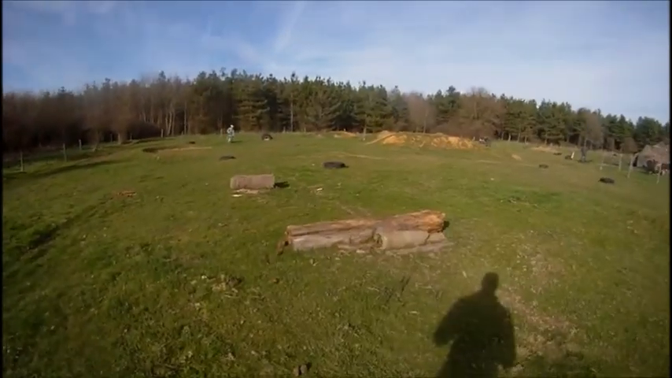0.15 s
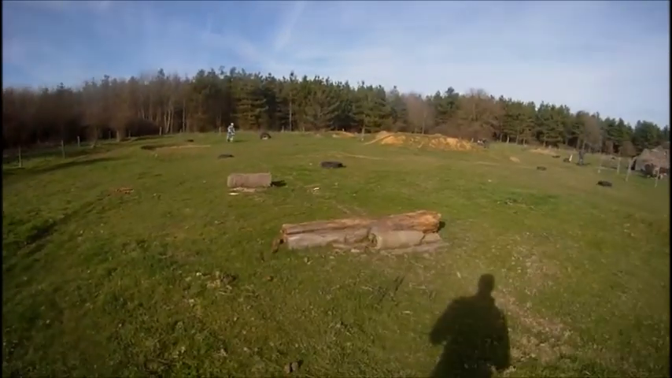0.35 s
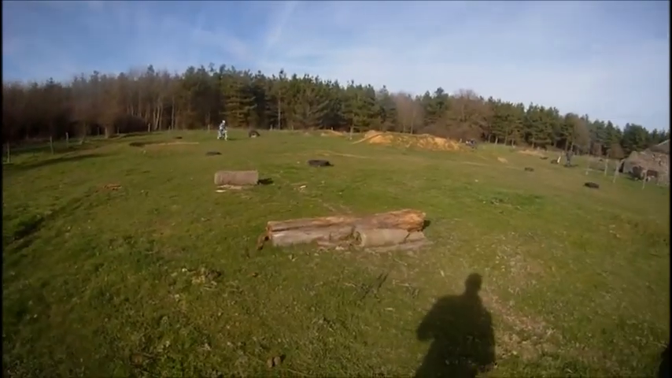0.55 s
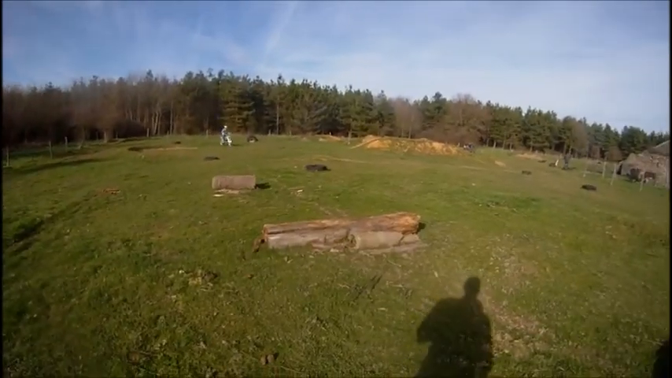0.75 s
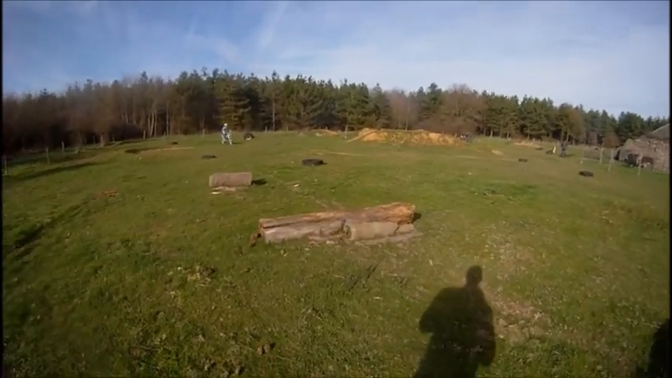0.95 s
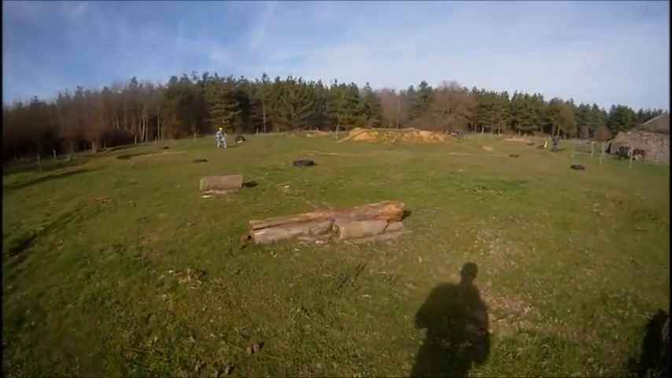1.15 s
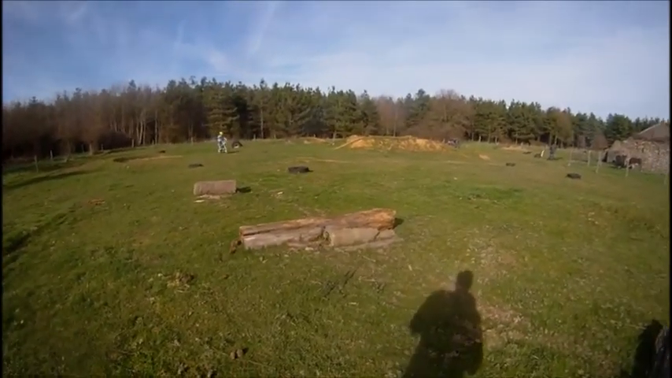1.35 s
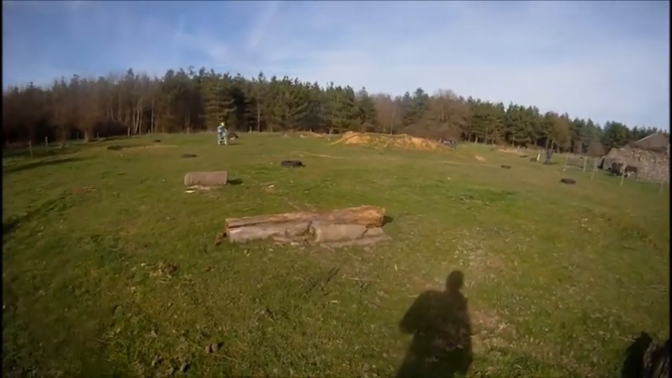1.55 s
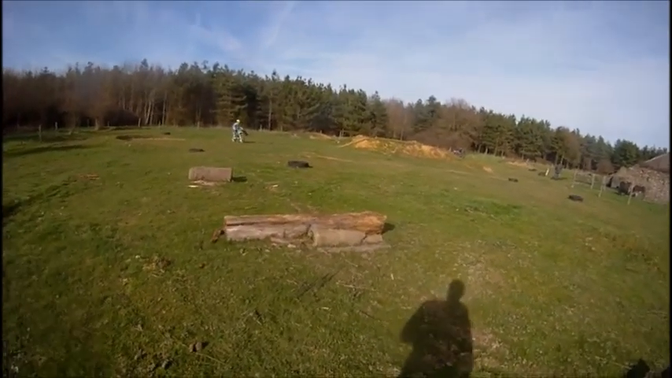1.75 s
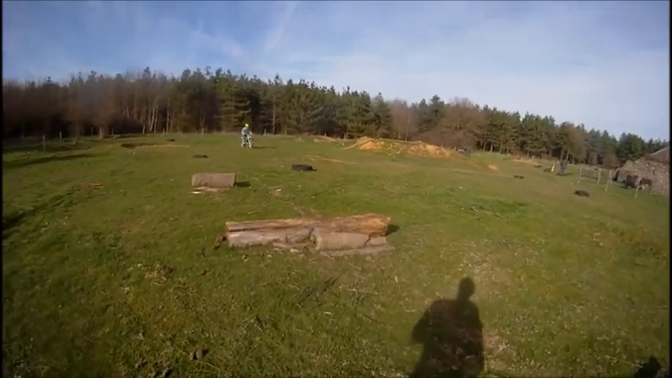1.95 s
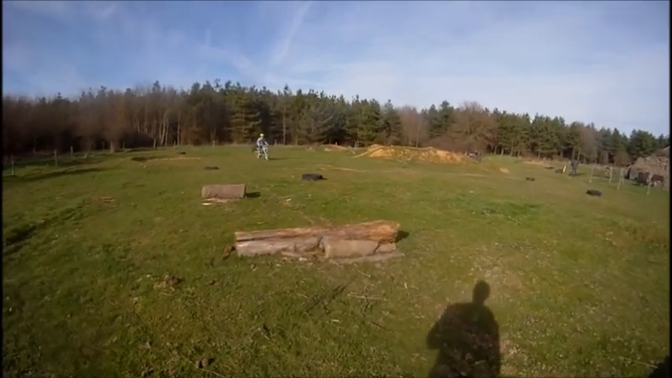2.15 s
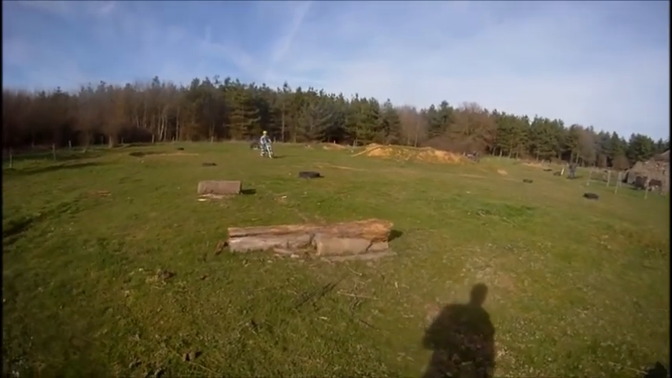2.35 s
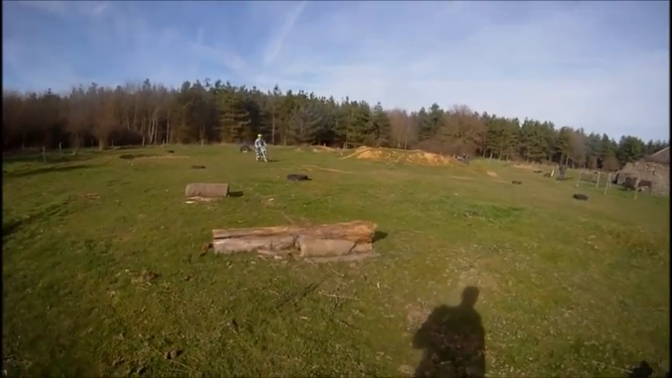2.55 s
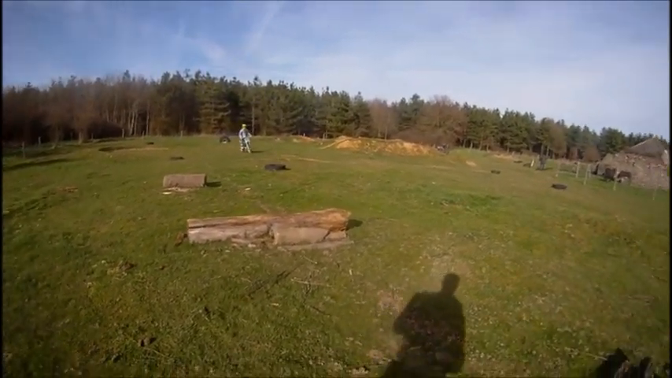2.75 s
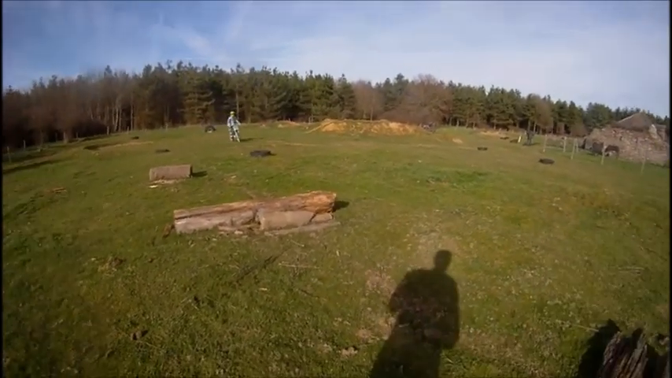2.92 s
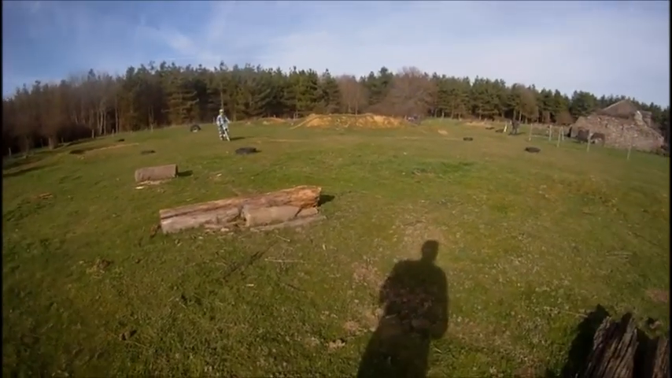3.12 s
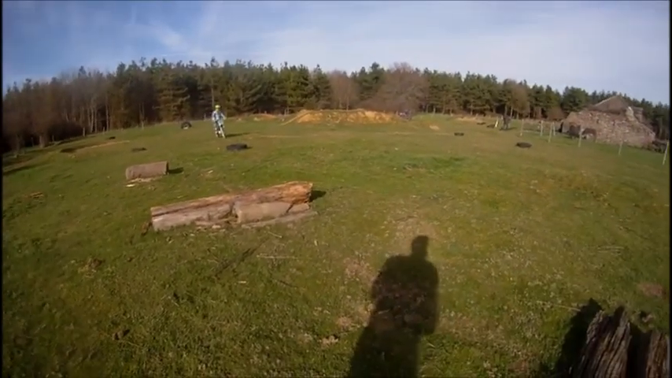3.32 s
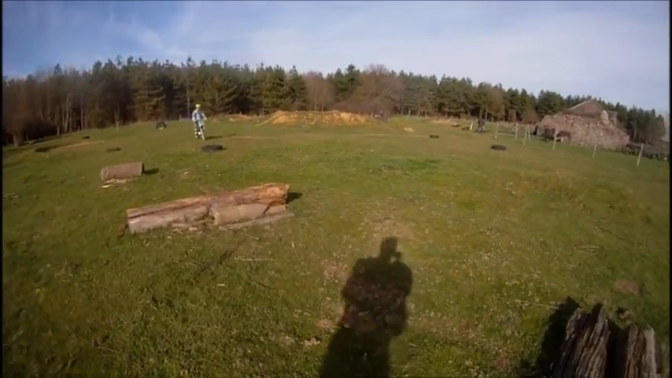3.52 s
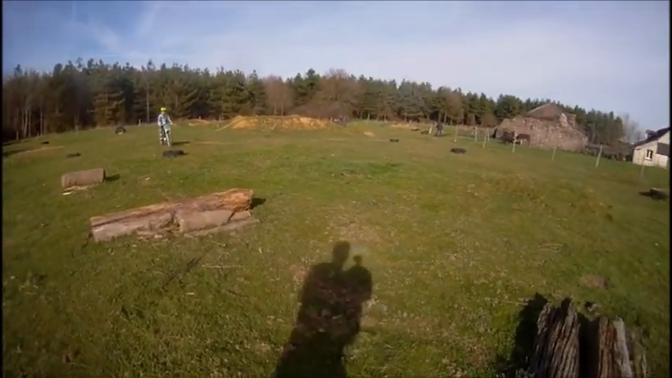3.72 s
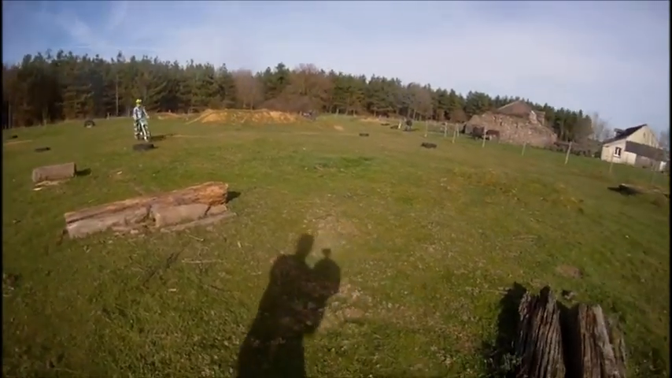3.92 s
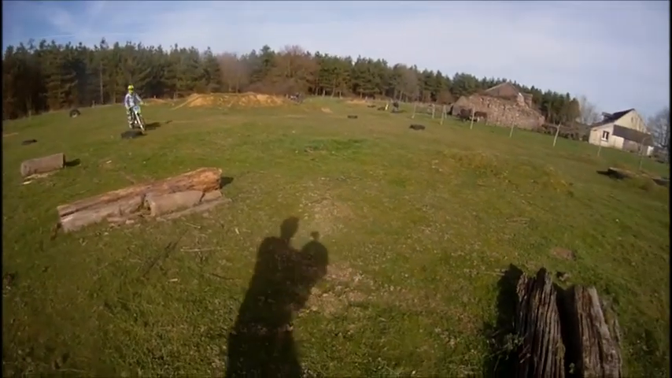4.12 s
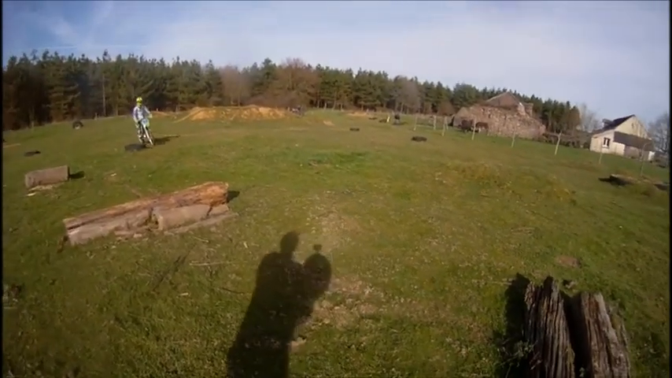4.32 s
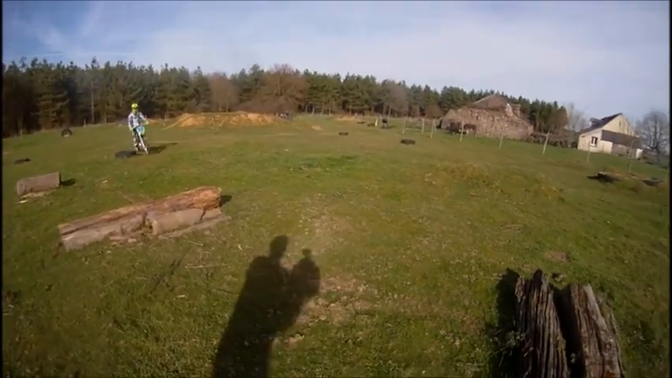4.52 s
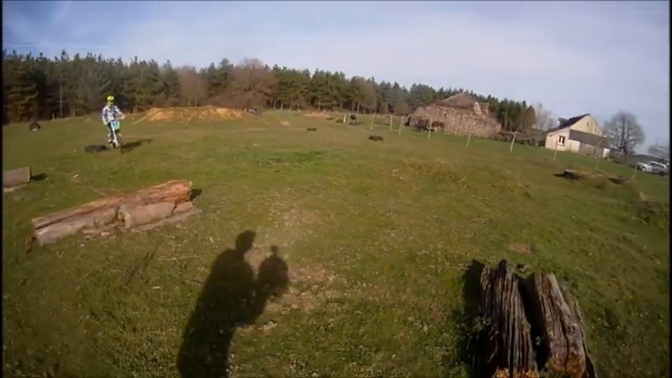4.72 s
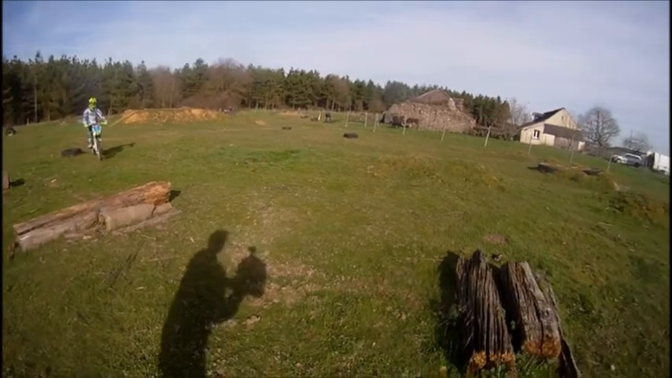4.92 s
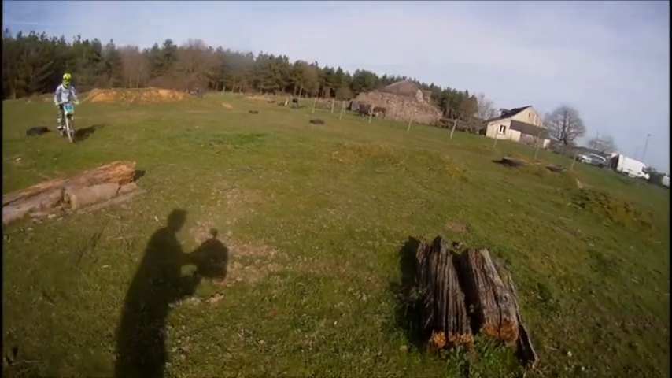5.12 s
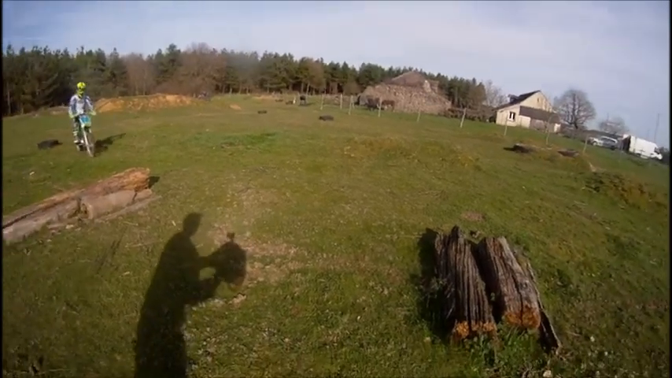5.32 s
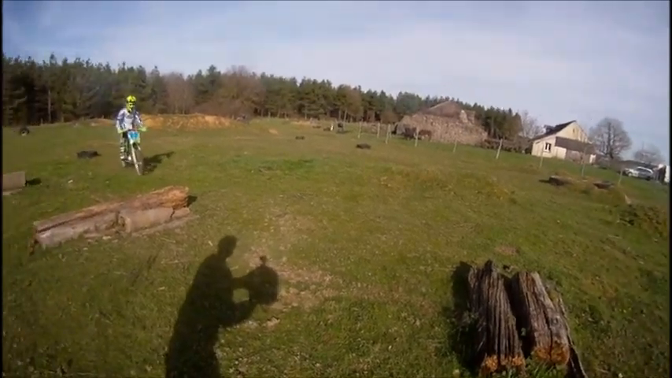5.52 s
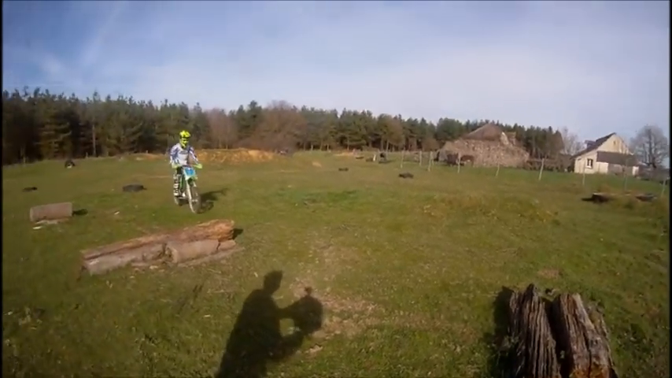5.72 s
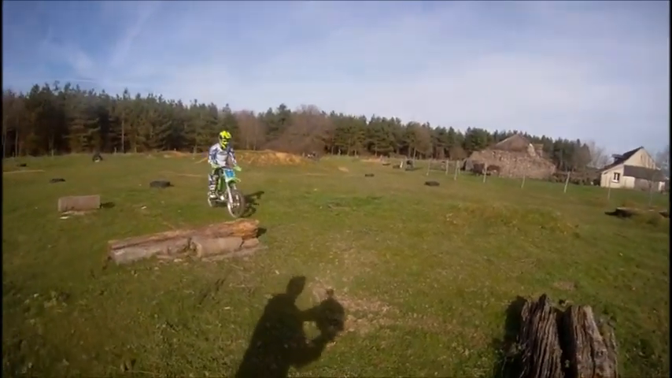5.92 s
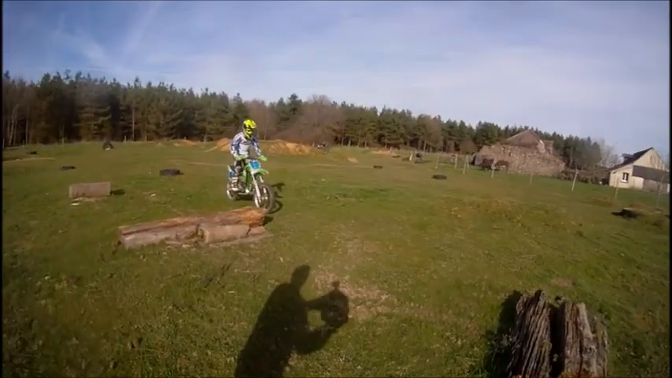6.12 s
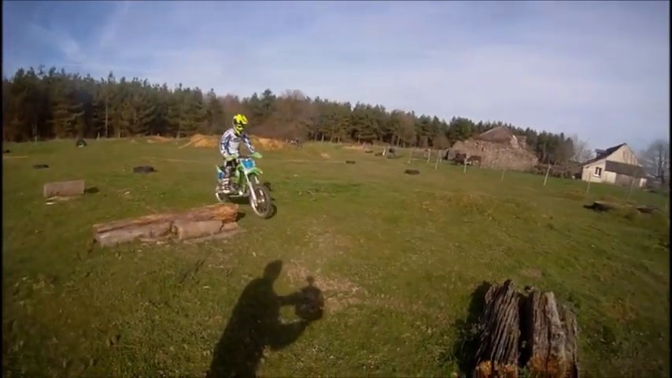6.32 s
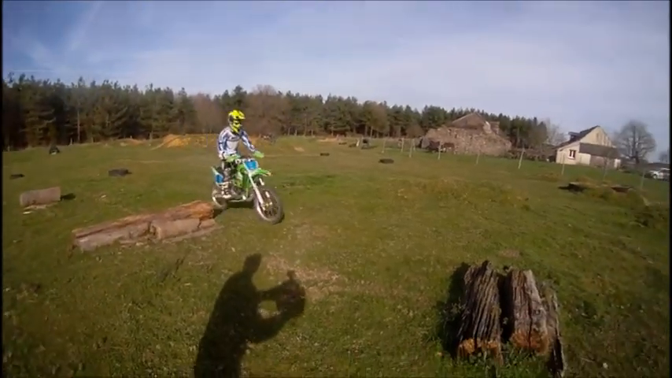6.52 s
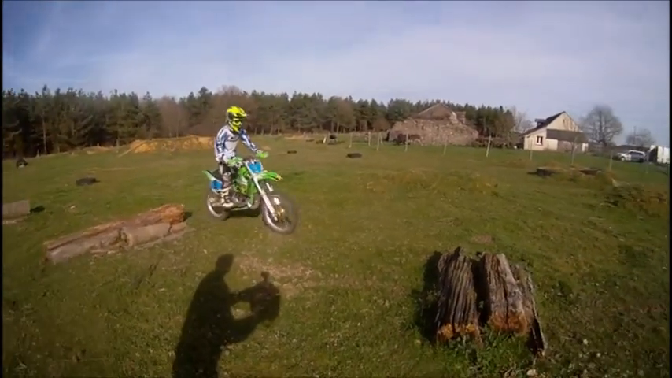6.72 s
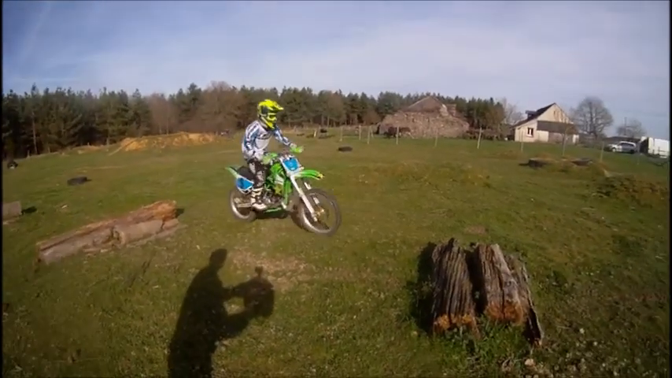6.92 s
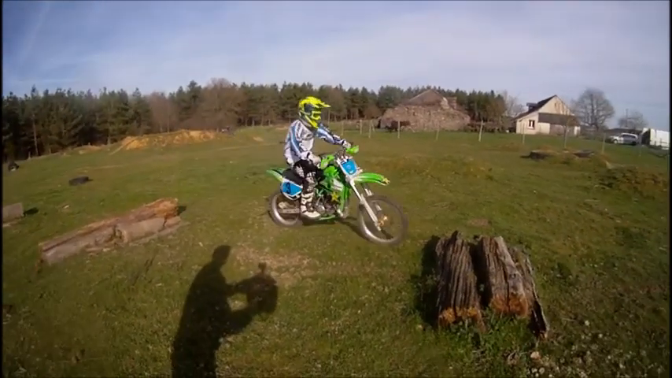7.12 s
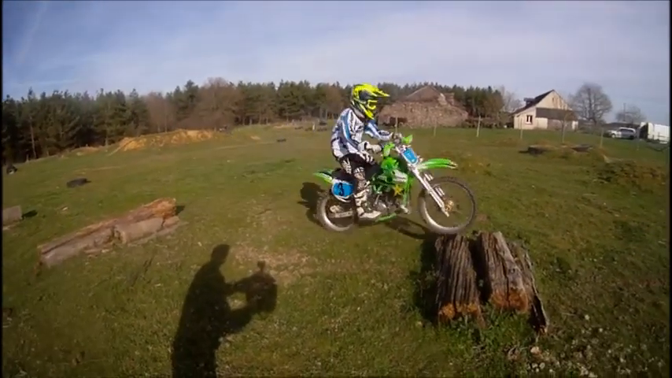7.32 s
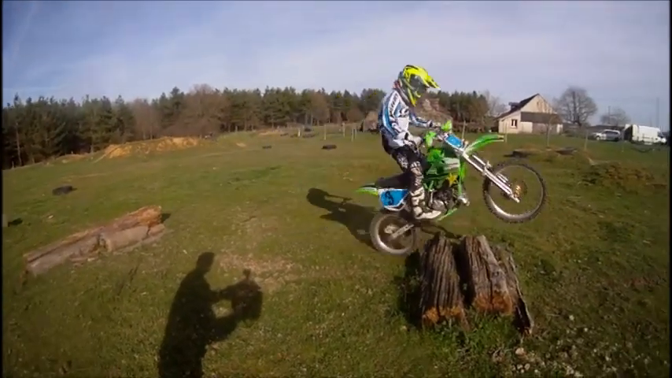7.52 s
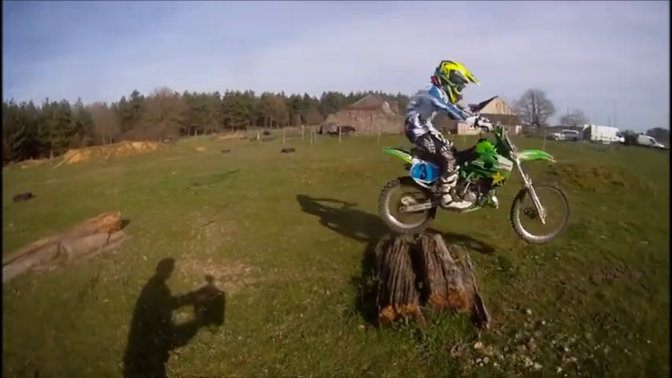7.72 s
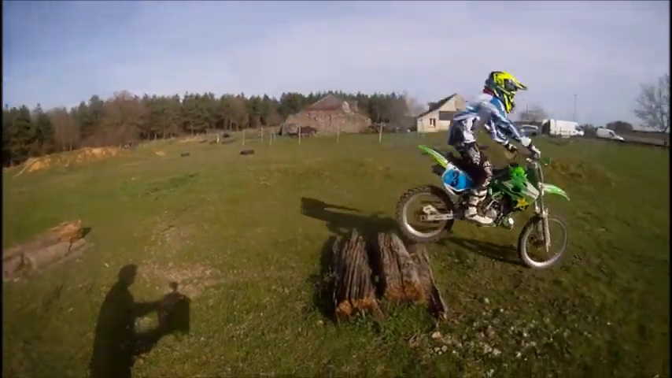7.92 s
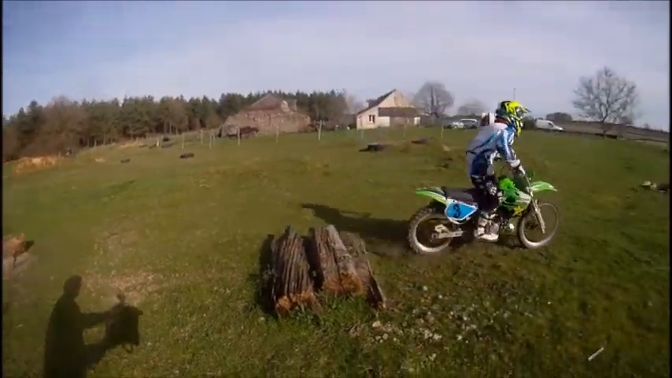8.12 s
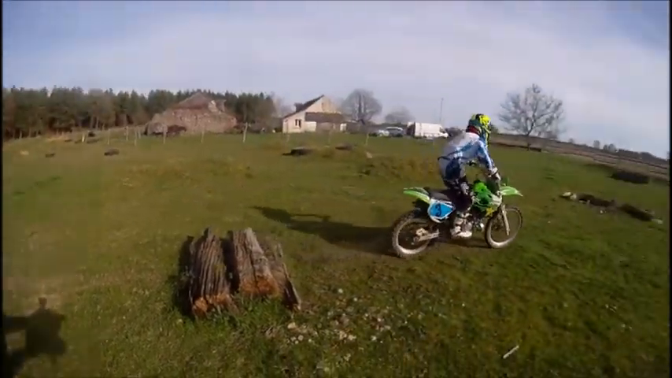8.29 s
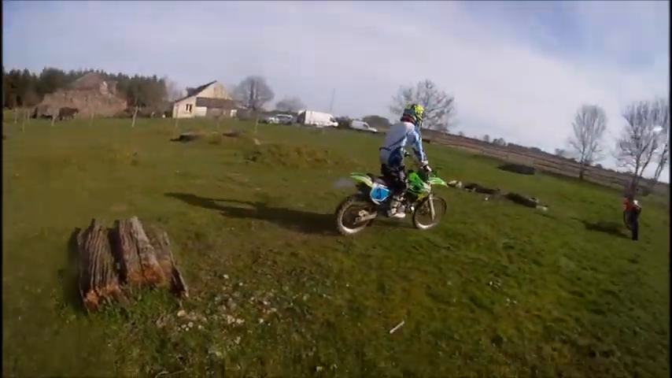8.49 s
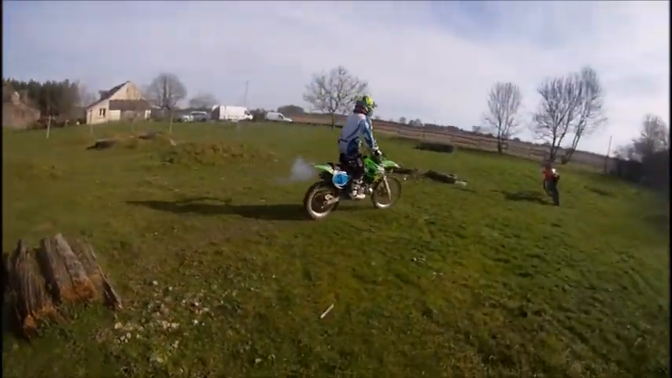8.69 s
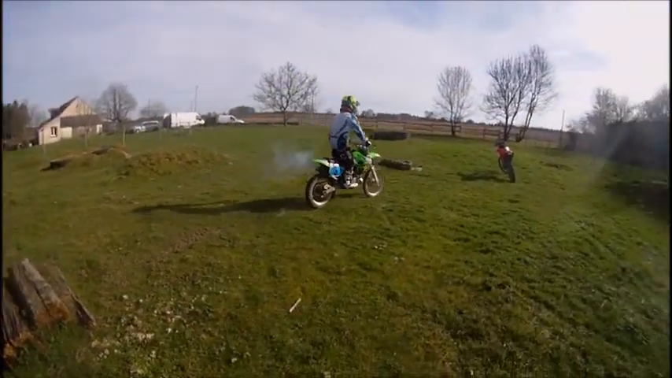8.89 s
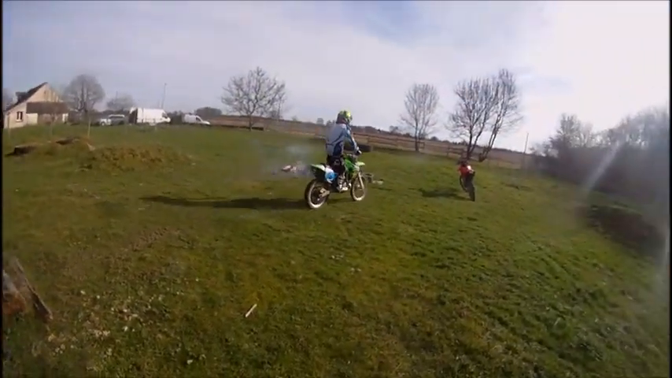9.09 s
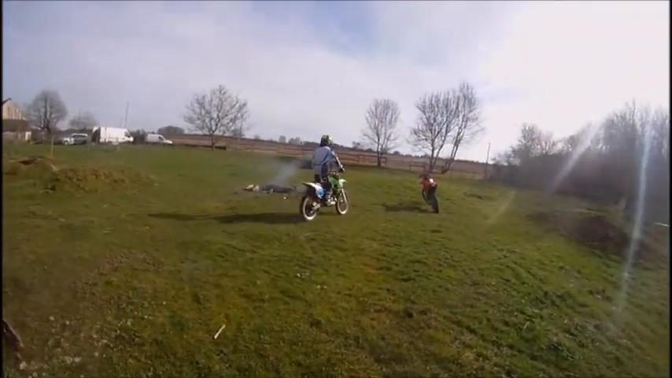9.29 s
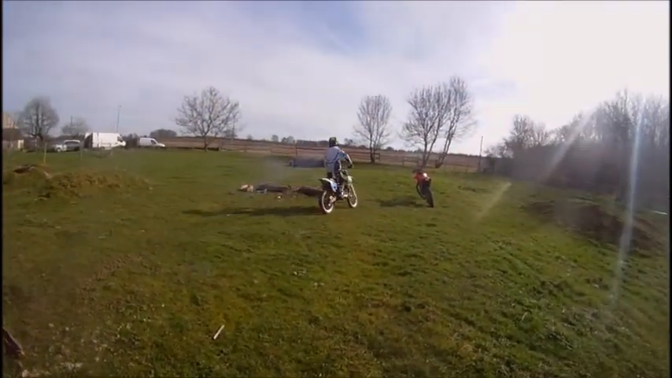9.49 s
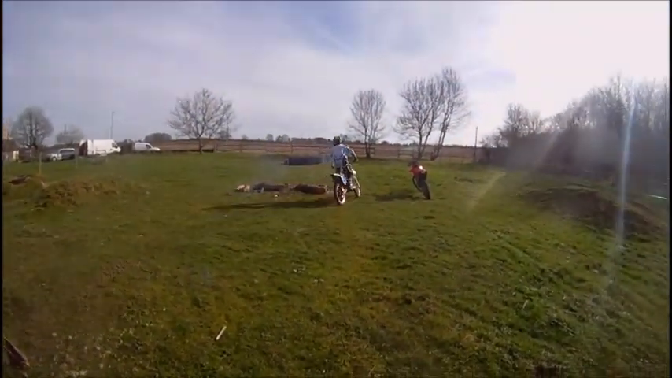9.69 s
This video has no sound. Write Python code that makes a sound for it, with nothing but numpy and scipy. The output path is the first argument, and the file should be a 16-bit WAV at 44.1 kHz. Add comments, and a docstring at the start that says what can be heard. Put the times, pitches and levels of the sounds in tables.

```python
"""Dirt bike over a log in a field

A small two-stroke crosses grass, revs over a log beside the microphone and rolls away.
Off the throttle it fires in single ringing pops, on the throttle at every turn, as clicks and gusts
that ring thin steel; a rattle of piston, chain and unfired puffs goes on underneath.
The plastic case around the microphone snaps shut as ringing modes, then scuffs and bumps as shaped noise.
Low rumble and hiss lie behind."""
import sys
import numpy as np
from scipy import signal
from scipy.fft import rfft, irfft
from scipy.io import wavfile
from scipy.ndimage import uniform_filter1d, map_coordinates

SR = 44100
rng = np.random.default_rng(int(sys.argv[2]) if len(sys.argv) > 2 else 0)


def store_wav(level_fs):
    """Save 16-bit WAV to argv[1]."""
    pcm = np.round(np.clip(np.atleast_2d(level_fs), -1, 1) * 32767)
    wavfile.write(sys.argv[1], SR, pcm.T.astype(np.int16))


N = 429975
TIME = np.arange(N) / SR   # s
TAPS = 16384   # length of every impulse response, in samples
BIN_HZ = np.maximum(np.arange(TAPS // 2 + 1) * SR / TAPS, 1)


def from_db(db):
    """Decibels to gain."""
    return 10 ** (np.asarray(db) / 20)


def unit_energy(x):
    """Scale a response so that it passes white noise at the same power."""
    return x / np.sqrt(np.sum(x ** 2) + 1e-20)


def in_time(rows):
    """A curve at every sample, straight between its rows."""
    return np.interp(TIME, *np.transpose(rows))


def at_hz(points):
    """A spectrum in dB at every frequency bin, straight over log frequency."""
    hz, db = np.transpose(points)
    return np.interp(np.log(BIN_HZ), np.log(hz), db)


def through(x, response):
    """Pass a sound through an impulse response."""
    return signal.oaconvolve(x, response)[:len(x)]


def causal(spectrum_db):
    """The minimum-phase response with this spectrum shape and unit energy: nothing sounds early."""
    cepstrum = irfft(np.log(from_db(spectrum_db)))
    cepstrum[1:TAPS // 2] *= 2
    cepstrum[TAPS // 2 + 1:] = 0
    return unit_energy(irfft(np.exp(rfft(cepstrum))))


def noise(colour):
    """Steady noise of rms close to 1."""
    return through(rng.standard_normal(N), causal(at_hz(colour)))


def hump(hz, width):
    """The response of one broad resonance; width in natural log of frequency."""
    return causal(-20 * np.log10(1 + (np.log(BIN_HZ / hz) / width) ** 2))


def waver(rate):
    """Slow chance of spread near 1, with so many new values a second."""
    return np.interp(TIME * rate, np.arange(TAPS), rng.standard_normal(TAPS))


def swell_and_fade(s, swell, fade):
    """Rise exponentially to 1 at one moment, then die away exponentially (all in s)."""
    return np.exp(-np.maximum((s - TIME) / swell, (TIME - s) / fade).clip(0, 20))


# lone firings off the throttle: (time [s], level before the lift and path gain [dB])
LONE_POPS = [(0.8473, -34.5), (0.9132, -39.5), (1.7686, -36.5), (3.7132, -34), (3.9567, -32), (4.0365, -30),
             (4.1275, -30), (4.1899, -30), (4.2349, -29), (4.6597, -29), (4.7176, -31.5), (5.1956, -31),
             (5.2936, -31), (5.3748, -31.5), (5.646, -35), (6.6031, -24), (6.6813, -27.5), (7.9964, -10.5),
             (8.0094, -3.5), (8.5005, -8)]
LONE_POP_LIFT_DB = 2   # added to every level of the table
POP_DELAY_S = .0005
# the bike's path, one row per colour below: (time [s], pop gain [dB], pop rise [s], pop t60 [s],
# field echo [dB], turbulence [0-1])
PATH = [(0.699, 15.5, 0.0035, 0.03, -19, 0.58), (1.498, 20, 0.0044, 0.05, -14.5, 0.02),
        (2.8, 18, 0.0044, 0.027, -20, 0.32), (4.6, 15.5, 0.0046, 0.028, -20, 0.66),
        (5.4, 19.5, 0.0049, 0.038, -22, 0.5), (6.3, 15, 0.003, 0.062, -12, 0.3),
        (7.7, 15.5, .0014, 0.035, -24, 0.37), (8.6, 10.5, 0.00045, 0.043, -27, 0.35)]
# colour of the bike at each place on its path: (frequency [Hz], relative density [dB per Hz])
SETTING_OFF = [(180, -64.5), (300, -42.5), (692, -18.5), (895, -29.5), (1020, -40.5), (1600, -24),
               (1790, -10), (2800, -4.5), (3400, 1), (4190, -8.5), (4920, -5), (6270, -6.5), (6900, -7),
               (7720, -17.5), (14000, -36)]
FAR = [(180, -55), (400, -31), (750, -60), (1050, -55), (1280, -8.5), (1800, -7), (2450, 3), (3000, -11),
       (3400, -1.5), (4300, -6), (5450, 2), (6850, -3.5), (7600, -13), (9600, -18), (14000, -64)]
TURNING = [(180, -28), (300, -29), (619, -21.5), (692, -12), (1140, -23.5), (1230, 1), (1550, -12),
           (2470, 2.5), (2940, -4.5), (3350, 3), (3690, -4.5), (6790, -6), (7600, -13), (14000, -40.5)]
TOWARD = [(180, -77), (300, -48), (692, -24.5), (1100, -27.5), (1230, 2), (1570, -21.5), (1730, -12.5),
          (2720, -7.5), (2940, -16), (3350, -3), (4260, -13), (4840, -3.5), (6270, -10), (14000, -41.5)]
HEAD_ON = [(180, -47), (300, -33), (681, -14.5), (881, -29), (1220, -6), (1550, -59), (2720, -5.5),
           (2940, -12.5), (3400, 2), (4260, -17), (4920, -5.5), (5780, -2), (6270, -16), (8500, -19),
           (14000, -48)]
CLOSING = [(180, -119), (300, -38), (715, -19), (1100, -26), (1250, 2.5), (1570, -17), (1760, -7),
           (2070, -8), (2470, -1), (3400, -9.5), (3630, -12), (3990, -5), (5170, -4.5), (14000, -38)]
PASSING = [(350, -45), (600, -32.5), (1140, -19), (1240, -12.5), (2040, -11), (2270, -3.5), (2870, -3.5),
           (3390, 0), (4280, -14.5), (5050, -10), (6200, -14.5), (7020, -11), (8050, -22), (14900, -43.5),
           (16000, -32)]
LEAVING = [(59, -85), (100, -44.5), (558, -27), (736, -21.5), (854, -14), (1230, -5), (1580, -11.5),
           (1720, -3.5), (2040, -2.5), (3320, 1.5), (3700, -6.5), (5080, -2.5), (5530, -6.5), (6990, -11),
           (10000, -26), (16000, -38.5)]


def exhaust(speed, blowdown_s):
    """Each firing is a pressure step and a gust of gas; its ring changes as the bike turns and nears."""
    path = np.array(PATH)
    path_s = path[:, 0]
    lone = np.add(LONE_POPS, [0, LONE_POP_LIFT_DB])
    s, db = np.vstack([lone, sputter_pops(uneven_db=0.57, jitter_s=.0002)]).T
    unsteady_speed = speed * (1 + .012 * waver(rate=25))
    pulling = pull_firings(unsteady_speed, uneven_db=1.16, jitter_s=.00005)

    clicks = pulling.copy()
    start = s - .5 * np.interp(s, path_s, path[:, 2])   # a pop is timed halfway up its rise
    at = np.round((start + POP_DELAY_S) * SR).astype(int)
    clicks[at] += from_db(db + np.interp(s, path_s, path[:, 1]))
    gust = unit_energy(np.exp(-TIME[:TAPS] / blowdown_s))
    gas = through(clicks, gust) * rng.standard_normal(N)

    peaks = chamber_db()
    out = tailpipe_note(pulling)
    colours = (SETTING_OFF, FAR, TURNING, TOWARD, HEAD_ON, CLOSING, PASSING, LEAVING)
    for k, colour in enumerate(colours):
        rise, t60, echo_db, rough = path[k, 2:]
        # neighbouring places crossfade at equal power
        facing = np.sqrt(np.interp(TIME, path_s, np.arange(len(path)) == k))
        response = through(shell_ring(rise, t60, echo_db), causal(at_hz(colour) + peaks))
        source = np.sqrt(1 - rough ** 2) * clicks + rough * gas
        out = out + through(facing * source, response)
    return out


# open throttle, firing at every turn; levels hold at cruising speed, before the ring of the bike:
# (start [s], end [s], first level [dB], last level [dB])
PULLS = [(1.265, 1.735, -45.5, -46.5), (2.313, 2.43, -47, -47.5), (6.085, 6.585, -42, -42),
         (7.165, 7.983, -30.5, -28)]
CRUISE_TURNS_PER_S, PULL_DB_PER_OCTAVE = 66.1, 12   # firings grow by so much per doubling of speed


def pull_firings(speed, uneven_db, jitter_s):
    """On the throttle every turn of the crank fires, each a little differently, and harder the faster it spins."""
    clicks = np.zeros(N)
    turns = np.cumsum(speed) / SR
    for start, end, first_db, last_db in PULLS:
        first_turn, last_turn = np.interp([start, end], TIME, turns)
        s = np.interp(np.arange(first_turn, last_turn), turns, TIME)
        chance = rng.standard_normal((len(s), 2))
        at = ((s + jitter_s * chance[:, 0]) * SR).astype(int)
        db = np.interp(s, [start, end], [first_db, last_db])
        db = db + PULL_DB_PER_OCTAVE * np.log2(speed[at] / CRUISE_TURNS_PER_S)
        # spread over one turn, so the level is that of the running engine
        clicks[at] = from_db(db + uneven_db * chance[:, 1]) * np.sqrt(SR / speed[at])
    return clicks


# on a light throttle only every second to fourth turn fires, in even runs; levels before the path gain:
# (start [s], end [s], count, first level [dB], last level [dB])
SPUTTERS = [(0.026, 0.33, 11, -35.5, -35), (.392, .581, 7, -40.5, -34), (.612, 0.801, 7, -32, -31.5),
            (1.212, 1.244, 2, -33.5, -32.5), (2.021, 2.299, 11, -35.5, -35.5), (2.456, 2.694, 5, -35, -32),
            (2.764, 2.973, 6, -32, -33), (3.001, 3.197, 8, -34.5, -35.5), (3.236, 3.405, 5, -34, -34),
            (3.459, 3.637, 5, -35, -31.5), (3.777, 3.894, 5, -32, -33), (4.297, 4.619, 12, -27.5, -29.5),
            (5.453, 5.554, 3, -31.5, -31.5), (6.007, 6.047, 2, -27.5, -27.5), (7.071, 7.139, 3, -21, -15),
            (8.546, 8.666, 5, -5.5, -7.5), (8.7, 8.95, 9, -7, -9), (8.985, 9.164, 7, -9, -10.5),
            (9.187, 9.368, 7, -11.5, -10.5)]


def sputter_pops(uneven_db, jitter_s):
    """Runs of near-evenly paced pops that swell or fade, each slightly uneven; rows of (time [s], level [dB])."""
    runs = []
    for start, end, count, first_db, last_db in SPUTTERS:
        runs.append(np.linspace((start, first_db), (end, last_db), round(count)))
    pops = np.vstack(runs)
    return pops + rng.standard_normal(pops.shape) * [jitter_s, uneven_db]


# exhaust note under load, strongest while the bike is near: (time [s], level against the firing [dB])
NOTE = [(6, -32), (7.2, -23.5), (7.45, -21), (7.65, -20), (7.93, -19.5), (8, -31)]
# its colour: (frequency [Hz], relative density [dB per Hz])
NOTE_COLOUR = [(60, -49), (110, -28), (160, -2.5), (270, -13), (400, -2), (560, -10.5), (760, -0.5),
               (1050, -2.5), (1400, 11.5), (2400, 0.5), (4000, -21)]


def tailpipe_note(pulling):
    """Under load the tailpipe's own pulses carry clean low harmonics that glide with the crank."""
    return through(pulling * from_db(in_time(NOTE)), causal(at_hz(NOTE_COLOUR)))


# ringing of the expansion chamber and cylinder fins:
# (frequency [Hz], width [Hz], lift before levelling [dB])
CHAMBER = [(709, 354, 26.5), (1017, 100, 11), (1226.5, 110, 11.5), (1419, 280, 12.5), (1758, 152, 11.5),
           (2020, 69, -3), (2280, 670, 4), (2635, 92, 3.5), (3352, 200, 7.5), (4006, 110, 9.5),
           (4420, 440, 4.5), (4957, 300, 9.5), (5330, 510, 5.5), (5867, 290, 8), (6814, 480, 7.5),
           (8040, 270, 0.5), (9070, 600, 3)]


def chamber_db():
    """Resonance peaks with valleys between them, levelled over bands a little narrower than an octave."""
    peaks = sum(db / (1 + (2 * (BIN_HZ - hz) / width) ** 2) for hz, width, db in CHAMBER)
    grid = np.geomspace(20, SR / 2, 1000)
    mean = uniform_filter1d(np.interp(grid, BIN_HZ, peaks), size=80)
    return peaks - np.interp(BIN_HZ, grid, mean)


FIELD_T60_S = 0.39


def shell_ring(rise, t60, echo_db, crack_db=3, crack_s=0.0015, damping_hz=9000):
    """Countless thin-steel modes ring alike at each firing; ground and trees add a faint tail."""
    t = TIME[:TAPS]
    white = rng.standard_normal(TAPS)
    # the lasting part is duller than the opening crack
    lasting = through(white, causal(-10 * np.log10(1 + (BIN_HZ / damping_hz) ** 4)))
    tail = from_db(-60 * t / t60) + from_db(echo_db - 60 * t / FIELD_T60_S)
    crack = white * from_db(crack_db) * np.exp(-t / crack_s)
    swell = 1 - np.exp(-(t / rise) ** 2)   # scattering over the grass softens a far pop's edge
    ring = swell * (lasting * tail + crack)
    # flatten the broad spectrum; the colour is given elsewhere
    broad = np.sqrt(uniform_filter1d(np.abs(rfft(ring)) ** 2, size=48))
    return unit_energy(through(ring, causal(-20 * np.log10(broad))))


# crank speed, near steady but for a blip up the log and a hard rev off it: (time [s], speed [turns per s])
SPEED = [(7.3, 66.7), (7.48, 79.2), (7.6, 88), (7.72, 52), (7.79, 78), (7.88, 107.4), (7.97, 165),
         (8.12, 160), (8.45, 67)]


def crank_speed():
    """The crank's speed sets the pace of the pulls and of the rattle."""
    return in_time(SPEED)


# colour of the rattle, before the chamber's ringing: (frequency [Hz], relative density [dB per Hz])
RATTLE_COLOUR = [(180, -57), (300, -29), (510, -32.5), (715, -17), (1220, -2.5), (1550, -10), (1790, -6),
                 (1970, -3), (2470, -2), (3570, -7.5), (3990, -7.5), (5780, -16.5), (14000, -41)]


def rattle(speed, throb_db, slap, ring_depth):
    """The piston slaps once a turn; with the unfired puffs it stirs the same metal."""
    turns = np.cumsum(speed) / SR
    beat = from_db(throb_db * np.cos(2 * np.pi * turns))
    puffs = rng.standard_normal(N) * beat / np.sqrt(np.mean(beat ** 2))
    knocks = np.diff(np.floor(turns), prepend=0) * np.sqrt(SR / speed)
    slaps = through(knocks, shell_ring(rise=0.0013, t60=0.036, echo_db=-27.0))
    hard = slap * speed / speed.max()   # the faster the crank, the harder the slap
    stir = np.sqrt(1 - hard ** 2) * puffs + hard * slaps
    return through(stir * rattle_level(), causal(at_hz(RATTLE_COLOUR) + ring_depth * chamber_db()))


# rattle of the bike as it nears and leaves, before load and clatter: (time [s], level [dB])
RATTLE = [(0, -57.5), (1, -61.5), (3.7, -62.5), (5.7, -54), (6.8, -51.5), (7.6, -43), (8.35, -48),
          (9.4, -49), (9.75, -56)]
LOAD_DB, LOAD_EASE_S = 4, .06   # more rattle while the engine fires
CLATTER_AT_S, CLATTER_DB, CLATTER_SPREAD_S = 8.085, -27.5, 0.078   # chain and engine shake after the landing


def rattle_level():
    """The rattle grows with nearness and load, and flares in a clatter after the landing."""
    firing = sum((TIME > start) & (TIME < end) for start, end, *_ in SPUTTERS + PULLS)
    load = uniform_filter1d(np.minimum(firing, 1.), int(LOAD_EASE_S * SR))
    running = from_db(in_time(RATTLE) + LOAD_DB * load)
    clatter = from_db(CLATTER_DB) * np.exp(-((TIME - CLATTER_AT_S) / CLATTER_SPREAD_S) ** 2)
    return running + clatter


def ground_bounce(x, lag_s, sway, bounce_db):
    """The ground sends a copy a little later; the lag shifts as the bike bucks, so the colour keeps moving."""
    lag = lag_s * np.exp(sway * waver(rate=6))
    gain = from_db(bounce_db)
    late = map_coordinates(x, [np.arange(N) - lag * SR], order=3)
    return (x + gain * late) / np.sqrt(1 + gain ** 2)


# snaps of the microphone's case, before the low cut: (time [s], level [dB], slip length [s],
# hollow ring [dB], ring length as a share of the free ring [0-1])
SNAPS = [(0.0653, -14, 0.0028, -4.5, 1), (0.0796, -15.5, 0.0015, -24.5, 1), (0.0898, -3.5, 0.00096, -2, 1),
         (0.1082, 4.5, 0.0028, -1.5, 1), (0.308, -15.5, 0.0035, 7, 0.18), (0.3576, 2.5, 0.003, 5.5, 0.41)]
# modes of the case ringing free, the hollow one first: (frequency [Hz], level [dB], t60 [s])
CASE = [(1970, -1.5, 0.015), (2310, -12, 0.012), (2880, -9, 0.019), (3370, -10, 0.0081),
        (4210, -0.5, 0.0059), (4540, -4, 0.0008), (5810, -8, 0.0078), (7760, -5, 0.0026),
        (10100, -20, 0.0028)]


def snaps(crack_db, grit, low_cut_hz=1100, long_slip_s=0.0013):
    """A catch slips for a few milliseconds at most and sets the plastic case ringing."""
    out, t = np.zeros(N), TIME[:TAPS]
    for s, db, length, hollow_db, ring_share in SNAPS:
        modes = []
        for hz, level, t60 in CASE:
            modes.append(from_db(level - 60 * t / (t60 * ring_share)) * np.sin(2 * np.pi * hz * t))
        scrape = unit_energy(rng.standard_normal(TAPS) * np.exp(-(t / length) ** 4))
        slip = grit * min(length / long_slip_s, 1) * scrape
        slip[0] += 1   # the first release is a click
        signs = rng.choice([-1, 1], len(CASE) - 1)
        body = from_db(hollow_db) * modes[0] + signs @ modes[1:]
        at = round(s * SR)
        out[at:at + TAPS] += from_db(db) * (through(slip, body) + from_db(crack_db) * slip)
    low_cut = signal.butter(2, low_cut_hz, "high", fs=SR, output="sos")
    return signal.sosfilt(low_cut, out)   # a small shell radiates little bass


SEAL_S = 0.022   # the seal presses home


def case_openness():
    """1 until the last snap latches the case, then an exponential fall to 0."""
    return np.exp(-np.maximum(TIME - SNAPS[-1][0], 0) / SEAL_S)


# fingers and sleeve scuff the case: (time [s], level [dB], swell [s], fade [s], crispness [dB])
SCUFFS = [(1.954, -50.5, 0.0036, 0.0071, -11), (2.02, -49.5, 0.039, 0.065, -9),
          (2.12, -47.5, 0.055, 0.027, -20), (2.28, -64, 0.022, .02, -20), (4.91, -59, 0.0072, 0.017, 6.5),
          (4.965, -51.5, 0.018, 0.031, -4), (5.075, -49.5, 0.025, 0.013, 2),
          (5.885, -32.5, .007, 0.047, -7.5), (5.939, -35, 0.0068, 0.017, -5),
          (5.969, -14, 0.0093, 0.0049, -41), (8.855, -20, 0.01, 0.0079, -23)]
# their colour, before the chamber-shaped peaks: (frequency [Hz], relative density [dB per Hz])
SCUFF_COLOUR = [(29, -57), (50, -33), (90, -22.5), (280, -18), (371, -11), (481, -16.5), (735, -3),
                (887, -7), (1050, -2.5), (1640, -6), (1760, -4.5), (2560, 0.5), (5720, -22), (7770, -34),
                (14000, -90)]


def scuffs(ring_depth, crisp_hz=3600):
    """Rubbing swells and dies away as rough noise; cloth sounds crisper than skin."""
    force, crisp = 0, 0
    for s, db, swell, fade, crisp_db in SCUFFS:
        stroke = from_db(db) * swell_and_fade(s, swell, fade)
        force = force + stroke
        crisp = crisp + stroke * from_db(crisp_db)
    rub_colour = causal(at_hz(SCUFF_COLOUR) + ring_depth * chamber_db())
    rub = through(force * rng.standard_normal(N), rub_colour)
    return rub + through(crisp * rng.standard_normal(N), hump(crisp_hz, width=0.22))


# soft bumps on the case: (time [s], level [dB], pitch [Hz])
BUMPS = [(2.52, -67, 212), (2.851, -62.5, 161.6), (3.03, -67, 165), (4.159, -63, 198), (5.029, -60.5, 200),
         (5.191, -51.5, 175), (5.969, -40, 170), (6.362, -56, 182), (8.862, -43, 180), (8.94, -47, 164),
         (9.002, -46, 153.9), (9.55, -59, 590)]


def bumps(length_s, width):
    """Each soft touch is a short dull thud around one pitch."""
    out = np.zeros(N)
    t = TIME[:TAPS] - TIME[TAPS // 2]   # the thud peaks in the middle
    for s, db, hz in BUMPS:
        thud = through(rng.standard_normal(TAPS), hump(hz, width)) * np.exp(-np.abs(t) / length_s)
        thud = from_db(db) * unit_energy(thud) * np.sqrt(length_s * SR)
        out += np.interp(TIME, s + t, thud, left=0, right=0)
    return out


# colour of the low rumble: (frequency [Hz], relative density [dB per Hz])
RUMBLE_COLOUR = [(10, -3), (30, -12.5), (80, -18.5), (200, -38), (600, -78)]
RUMBLE_LEAN_DB = 4   # left up and right down by this much


def rumble(case_open):
    """Low noise, mostly shared by the microphone's two ports, leaning left."""
    ports = noise(RUMBLE_COLOUR) + .2 * np.array([noise(RUMBLE_COLOUR), noise(RUMBLE_COLOUR)])
    return rumble_level(case_open) * ports * from_db([[RUMBLE_LEAN_DB], [-RUMBLE_LEAN_DB]])


# jolts of the hand that shake the case: (time [s], rumble level before the lean [dB])
JOLTS = [(2.05, -72), (5.2, -59.5), (5.97, -63), (8.95, -57)]
JOLT_SWELL_S, JOLT_FADE_S = .04, 0.09
RUMBLE_DB, OPEN_RUMBLE_DB = -83.5, -58.5   # always there; added while the case is open


def rumble_level(case_open):
    """Air stirs faintly at the ports, far more while the case is open; each jolt swells and dies away."""
    jolts = sum(from_db(db) * swell_and_fade(s, JOLT_SWELL_S, JOLT_FADE_S) for s, db in JOLTS)
    return from_db(RUMBLE_DB) + from_db(OPEN_RUMBLE_DB) * case_open + jolts


# colour of the background hiss: (frequency [Hz], relative density [dB per Hz])
HISS_COLOUR = [(20, -2.5), (100, -9), (195, 8.5), (225, 12.5), (255, 1), (700, -1.5), (5000, -3.5),
               (15000, -2.5)]
HISS_DB = -68.5


def hiss():
    """Steady coloured noise in the middle, with a weaker part of opposite sign at the two ports."""
    sides = np.array([[1], [-1]])
    return from_db(HISS_DB) * (noise(HISS_COLOUR) + from_db(-17.5) * noise(HISS_COLOUR) * sides)


OPEN_CASE_DB = 15.5   # the bike's extra level until the case is shut


def scene():
    """The bike and the case sounds sit in the middle; low rumble differs at each port and leans left."""
    speed = crank_speed()
    case_open = case_openness()
    bike = exhaust(speed, blowdown_s=0.008) + rattle(speed, throb_db=3.0, slap=0.65, ring_depth=1.27)
    bike = ground_bounce(bike, lag_s=.0022, sway=0.2026, bounce_db=-10)
    bike = bike * from_db(OPEN_CASE_DB * case_open)
    case = snaps(crack_db=-0.5, grit=1.0) + scuffs(ring_depth=0.69)
    low = bumps(length_s=.013, width=0.15) + rumble(case_open)
    return bike + case + low + hiss()


CUTOFF_HZ = 15700


def record(dry):
    """The microphone's two ports differ a little in the bass; peaks overload the input; the top is cut."""
    bass = signal.butter(1, 130, fs=SR, output="sos")
    side = .28 * signal.sosfilt(bass, dry.mean(axis=0))
    clipped = np.clip(dry + side * np.array([[1], [-1]]), -.95, .95)
    top_cut = signal.ellip(12, .1, 95, CUTOFF_HZ, fs=SR, output="sos")
    return signal.sosfilt(top_cut, clipped)


dry = scene()
out = record(dry)
store_wav(out)
```